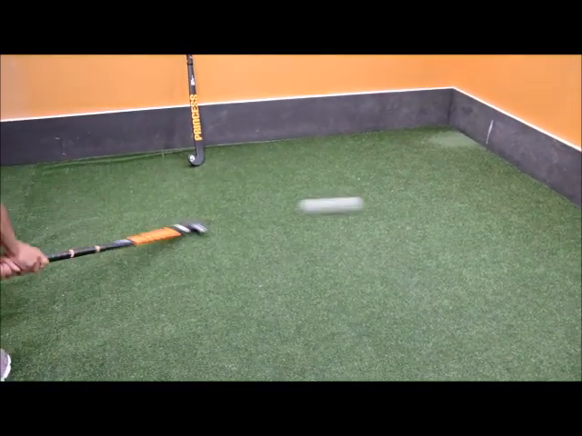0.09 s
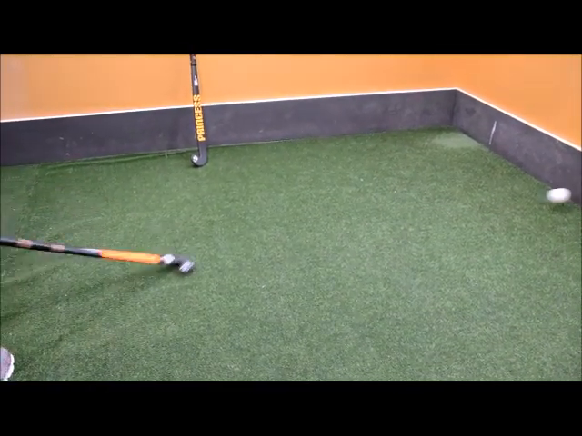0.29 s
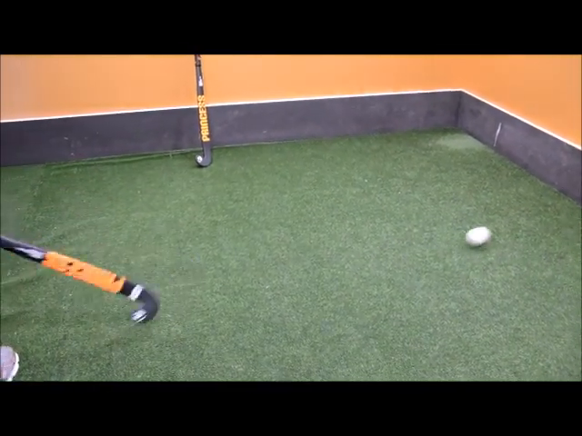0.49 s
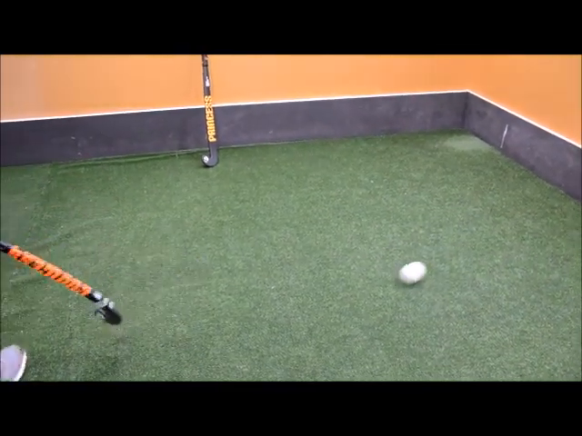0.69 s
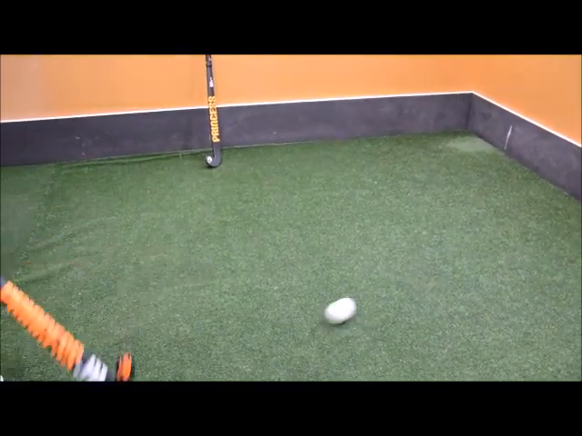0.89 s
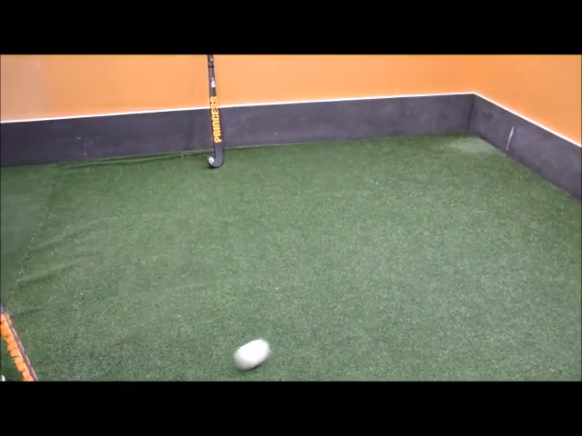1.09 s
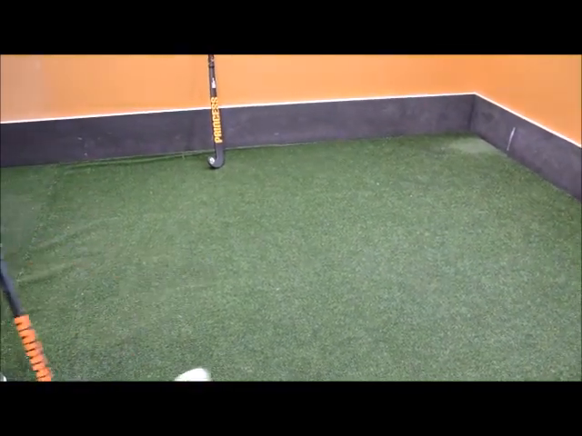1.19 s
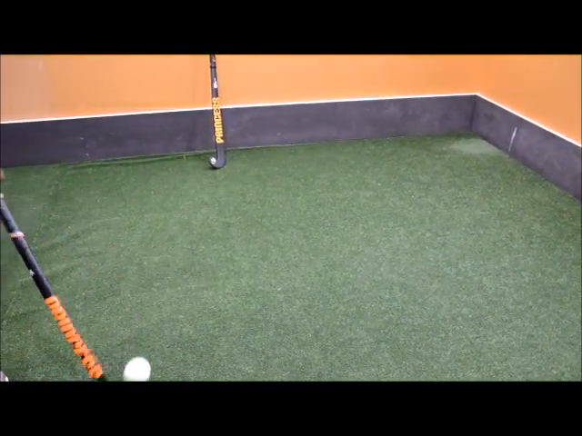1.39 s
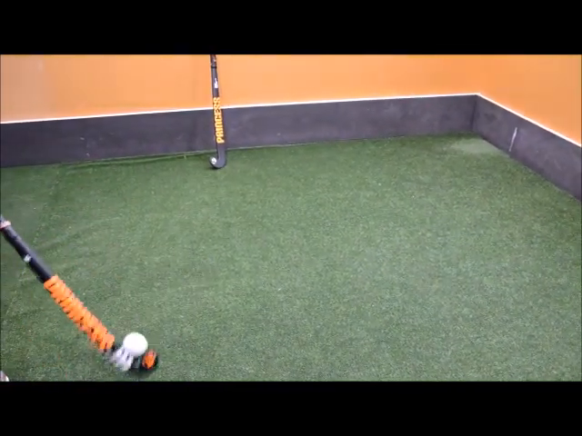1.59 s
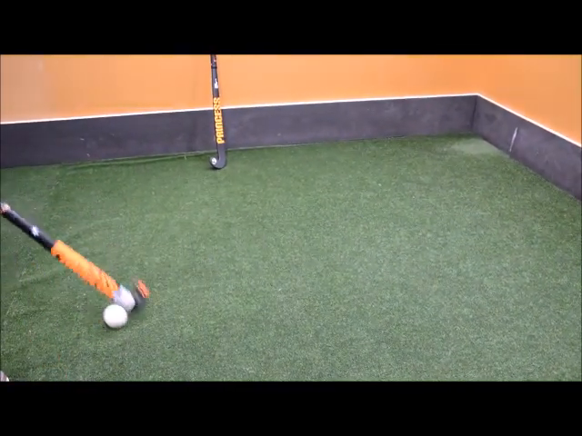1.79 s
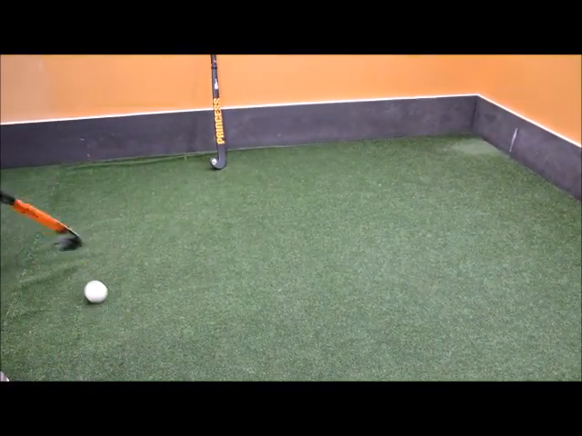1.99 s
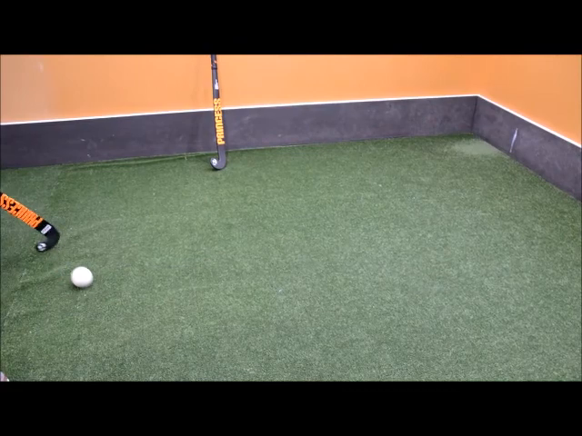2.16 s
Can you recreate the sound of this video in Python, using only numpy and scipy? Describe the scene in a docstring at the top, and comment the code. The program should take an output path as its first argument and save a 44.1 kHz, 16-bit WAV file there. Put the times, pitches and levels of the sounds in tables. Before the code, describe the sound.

Loud ball-on-board bang in a small echoing indoor pitch, followed by a sharp stick knock and light tap

```python
"""A stick shot from just before the start still rings over a quiet ventilation hum, and the turf hisses.
A hard hockey ball slams into the side board of a small echoing indoor pitch and overloads the microphone.
Then the stick stops the ball and taps it. Knocks are sharp cracks plus fading sine waves, with echoes;
shoes and stick scuff the turf as filtered noise with soft thuds, and the hum is shaped noise."""
import sys
import numpy as np
from scipy import signal
from scipy.io import wavfile
from scipy.ndimage import uniform_filter1d

SR = 44100
rng = np.random.default_rng(int(sys.argv[2]) if len(sys.argv) > 2 else 0)


def how_loud(loudness_db):
    """Turn decibels into a plain amplitude multiplier (0 dB gives 1, 20 dB gives 10)."""
    steps = np.asarray(loudness_db, float) / 20
    return 10 ** steps


def master_out(mix):
    """Clip the mix to full scale and print it as 16-bit PCM to the path in sys.argv[1]."""
    frames = np.transpose(np.atleast_2d(mix))
    ceiling = np.clip(frames, -1, 1)
    pcm = np.round(ceiling * 32767).astype(np.int16)
    wavfile.write(sys.argv[1], SR, pcm)


N = 97020  # length in samples
LEAD = SR // 5  # samples made ahead of the start, for the shot that still rings

# Ball on stick. Each row: time in seconds, delay of the first wall echo in seconds.
STICK_TIMES = [(-.07, .0095), (1.2970, .0100), (1.6726, .0089)]
# Strength of those hits. Each row: ring level in dB, crack level in dB, ring tilt in dB per octave,
# crack tilt in dB per octave, level in dB of the ball's thump on the floor.
STICK_HITS = [(-11, 1.5, -6.1, -2, -29), (-9, -5, -1.65, 2, -26), (-22.5, -11, -5.2, -1, -30)]
# Ways the stick vibrates. Each row: frequency in Hz, level in dB before the hit's strength and tilt,
# longest time in seconds to fade by 60 dB.
STICK_MODES = [(520, -17.5, 0.047), (598, -12.5, 0.031), (755, -6, 0.027), (860, -4.5, .02),
               (1120, -2, 0.024), (1295, -1, 0.017), (1684, -6, .055), (2765, -15, 0.0081),
               (3550, -11, 0.024), (4500, -13.5, .005)]
# Tone of the stick's crack before its tilt. Each row: frequency in Hz, gain in dB.
STICK_CRACK = [(200, -21.5), (700, -3.5), (1500, 10), (2300, -4.5), (3500, 2.5), (4500, 1.5), (5700, -0.5),
               (8000, -2.5), (10000, -10.5), (12500, -8), (16500, -15.5)]
# Ways the board vibrates. Each row: frequency in Hz, level in dB before the hit's strength,
# longest time in seconds to fade by 60 dB.
BOARD_MODES = [(101.4, -6.5, 0.075), (131.2, -6.5, 0.11), (176.2, -2, 0.042), (225, -9.5, 0.12),
               (280, -4.5, 0.1), (346, 0, 0.04), (387.6, -3.5, 0.086), (508, -2.5, .04), (691, 1, 0.03),
               (920, -1.5, 0.028), (1052, -9, 0.061), (1380, 11.5, 0.008), (1700, -10.5, 0.006)]
# Tone of the board's crack. Each row: frequency in Hz, gain in dB.
BOARD_CRACK = [(200, -41.5), (700, -33.5), (2000, 13), (2800, 5), (3800, 10.5), (4800, 7), (6200, 10.5),
               (9000, -0.5), (11500, -7.5), (14000, -10.5), (16500, -14)]
# Wall echoes. Each entry: delay, as a multiple of the first echo's delay.
ECHO_DELAYS = [1, 1.5, 1.95, 2.7, 3.65]
# Strength of those echoes. Each entry: level in dB against the direct sound.
ECHO_LEVELS = [-6, -13, -11, -16, -15]
# How fast the hall falls silent. Each row: frequency in Hz, time in seconds to fade by 60 dB.
HALL_T60 = [(60, 0.2), (150, 0.44), (350, 0.56), (700, 0.77), (1500, 0.56), (3000, .5), (6000, 0.5),
            (12000, 0.49)]
# Tone of the hall's tail. Each row: frequency in Hz, relative starting level in dB.
HALL_COLOUR = [(60, -22.5), (300, -1), (1500, -6), (2400, 9), (3600, 4.5), (5000, -2.5), (7000, -8),
               (11000, -3), (14000, -14), (16500, -10.5)]
# Tone of the background. Each row: frequency in Hz, relative level in dB.
AIR_COLOUR = [(15, -79.5), (25, -61), (64, -15.5), (108, 2), (145, -18), (217, -10.5), (300, -13.5),
              (427, -17.5), (800, -18), (1250, -12.5), (1900, -21.5), (2800, -23), (3700, -19.5),
              (5000, -27.5), (8000, -36.5), (12000, -40.5), (16500, -62.5)]
# Small bright ticks on the turf. Each row: time of the peak in seconds, level in dB.
TICKS = [(.112, -56), (.187, -57), (.432, -53), (.555, -60), (.687, -59), (.711, -63), (1.471, -52),
         (1.892, -62)]
# Tone of a tick. Each row: frequency in Hz, relative level in dB.
TICK_COLOUR = [(2000, -48), (5000, 6.5), (9000, -3), (15000, -4), (17000, -37)]
# Scuffs on the turf. Each row: start in seconds, hiss level in dB, rise in seconds,
# time in seconds for the hiss to fade by 60 dB, footfall thud level in dB.
SCUFFS = [(0.131, -36, 0.033, 0.23, -52.5), (0.598, -50, 0.013, 0.82, -53),
          (0.723, -44.5, 0.0076, 0.55, -65), (1.47, -43, 0.0075, 0.13, -40.5),
          (1.58, -48, 0.018, 0.15, -47), (1.802, -45, 0.033, 0.13, -56), (2.098, -77, 0.01, 0.1, -53.5)]
# Tone of the scuffing hiss. Each row: frequency in Hz, relative level in dB.
SCUFF_COLOUR = [(880, -37), (1500, -6), (2040, -6.5), (2880, -4.5), (3550, -6.5), (5020, -13.5),
                (7540, -16), (16000, -51.5)]
# Low wavering tones that swell after the board hit: a hall resonance at 82 Hz, a faint fan hum at 223 Hz.
# Each row: frequency in Hz, level in dB, time in seconds to fade by 60 dB, rise in seconds.
LOW_TONES = [(82, -36, 1.8, .15), (223, -54, 3.5, .2)]

BOARD_S, BOARD_ECHO_S = .2227, .0054  # time of the board hit, delay of its first echo
BOARD_RING_DB, BOARD_CRACK_DB = 0.93, 2.2
BOARD_PUSH_S, STICK_PUSH_S = .0012, .0003  # rise time of the ring
THUMP_HZ, THUMP_T60_S = 324, 0.029  # ball on the floor
MOST_CYCLES, DAMPED_HZ = 80, 2800  # no mode rings longer; high modes far shorter
SCATTER_DB, SCATTER_S = -8, .002  # turf, stick and player scatter the first milliseconds
GROUND_S, GROUND_DB = .0007, -4  # the knock comes back off the ground at once
HALL_DB, HALL_RISE_S = 6.5, .007
AIR_DB = -57.5  # overall loudness of the background
AIR_PATCH_DB, FLICKER_DB, FLICKER_FROM_HZ = .8, 2.5, 4000  # the treble flickers
TICK_S = .003  # time from the start of a tick to its peak
BRISTLE_DB = 0.5  # unevenness of the hiss
THUD_HZ, THUD_T60_S = 109, 0.16  # footfall
WAVER_DB = 4  # unevenness of the low tones
MIC_LOW_HZ = 60  # the knocks and scuffs lose their bass below this
DRIVE_CURVE, CEILING = 3.2, 1.03  # hardness and height of the overload knee


def evened(x):
    """Scales to an average strength (rms) of 1."""
    return x / np.sqrt(np.mean(x ** 2) + 1e-20)


def read(points, hz):
    """Reads a table on a log-frequency axis."""
    f, value = np.transpose(points)
    return np.interp(np.log(hz + 1), np.log(f + 1), value)


def add(mix, s, sound):
    """Mixes a sound in at time s."""
    part = mix[LEAD + round(s * SR):][:len(sound)]
    part += sound[:len(part)]


def coloured(x, points):
    """Filters with the given gain curve, so that nothing sounds before its cause."""
    log_gain = np.log(how_loud(read(points, abs(np.fft.fftfreq(4096, 1 / SR)))))
    response = np.exp(np.conj(signal.hilbert(log_gain)))  # minimum phase
    taps = np.fft.ifft(response).real[:2048]
    return signal.fftconvolve(x, taps)[:len(x)]


def knock(modes, crack, crack_db, push_s, echo_s):
    """A sharp crack and fading vibrations, thrown back by the ground, the walls and the hall."""
    t = np.arange(SR + SR // 2) / SR
    ring = np.zeros(len(t))
    for k, (hz, db, t60) in enumerate(modes):
        longest_s = MOST_CYCLES / hz / (1 + (hz / DAMPED_HZ) ** 4)
        fade = how_loud(db - 60 * t / min(t60, longest_s))
        ring += (-1) ** k * fade * np.sin(2 * np.pi * hz * t)  # neighbours start in opposite directions
    ring *= 1 - np.exp(-(t / push_s) ** 2)
    click = (t == 0).astype(float)
    snap = how_loud(crack_db) * coloured(click, crack)

    early = SR // 10
    walls = rng.standard_normal(early) * np.exp(-t[:early] / SCATTER_S)
    walls = how_loud(SCATTER_DB) * walls / np.linalg.norm(walls)
    walls[0] = 1  # direct sound
    walls[round(GROUND_S * SR)] = how_loud(GROUND_DB)
    for delay, db in zip(ECHO_DELAYS, ECHO_LEVELS):
        walls[round(delay * echo_s * SR)] = how_loud(db)
    near = signal.fftconvolve(ring + snap, walls)[:len(t)]
    return near + hall(ring) + hall(snap)


def hall(x):
    """Many blurred reflections: noise that swells briefly, each band dying at its own speed."""
    hz, t, z = signal.stft(rng.standard_normal(SR), SR, nperseg=256)
    gain_db = read(HALL_COLOUR, hz)[:, None] - 60 * t / read(HALL_T60, hz)[:, None]
    tail = signal.istft(z * how_loud(gain_db), SR, nperseg=256)[1][:SR]
    tail = tail * (1 - np.exp(-(np.arange(SR) / SR / HALL_RISE_S) ** 2))
    tail = tail / np.linalg.norm(tail)
    return how_loud(HALL_DB) * signal.fftconvolve(x, tail)[:len(x)]


def stick_hit(echo_s, ring_db, crack_db, tilt_db, crack_tilt_db, thump_db):
    """Ball on stick: the tilts set how bright the ring and crack are; the ball thumps on the floor."""
    modes = [(THUMP_HZ, thump_db, THUMP_T60_S)]
    for hz, db, t60 in STICK_MODES:
        modes.append((hz, ring_db + db + tilt_db * np.log2(hz / 1000), t60))
    crack = [(hz, db + crack_tilt_db * np.log2(hz / 4000)) for hz, db in STICK_CRACK]
    return knock(modes, crack, crack_db, STICK_PUSH_S, echo_s)


def air():
    """Ventilation and microphone hiss: noise with drifting patches and a flickering treble."""
    hz, t, z = signal.stft(rng.standard_normal(N + 2048), SR, nperseg=1024, noverlap=768)
    patches = uniform_filter1d(rng.standard_normal(z.shape), size=8, axis=0)  # smooth across frequency
    patches = evened(uniform_filter1d(patches, size=12, axis=1))  # and across time
    flicker = evened(uniform_filter1d(rng.standard_normal(len(t)), size=3))
    flicker = flicker * (hz / (hz + FLICKER_FROM_HZ))[:, None]
    z = z * how_loud(read(AIR_COLOUR, hz)[:, None] + AIR_PATCH_DB * patches + FLICKER_DB * flicker)
    noise = signal.istft(z, SR, nperseg=1024, noverlap=768)[1][:N]
    return how_loud(AIR_DB) * evened(noise)


def tick(db):
    """A few stiff bristles snap back: a tiny burst of bright noise."""
    t = np.arange(SR // 20) / SR
    burst = evened(coloured(rng.standard_normal(len(t)), TICK_COLOUR))
    swell = t / TICK_S * np.exp(1 - t / TICK_S)
    return how_loud(db) * burst * swell


def scuff(db, rise_s, t60, thud_db):
    """Bristles of turf hiss unevenly under a sole; the floor gives a soft thud."""
    t = np.arange(SR // 2) / SR
    grit, uneven = rng.standard_normal((len(t), 2)).T
    uneven = evened(uniform_filter1d(uneven, size=150))
    hiss = evened(coloured(grit * how_loud(BRISTLE_DB * uneven), SCUFF_COLOUR))
    thud = np.sin(2 * np.pi * THUD_HZ * t) * how_loud(thud_db - 60 * t / THUD_T60_S)
    rise = 1 - np.exp(-(t / rise_s) ** 2)
    return (hiss * how_loud(db - 60 * t / t60) + thud) * rise


def board_hit():
    """Ball on side board: the panel cracks and its many modes ring."""
    modes = [(hz, BOARD_RING_DB + db, t60) for hz, db, t60 in BOARD_MODES]
    return knock(modes, BOARD_CRACK, BOARD_CRACK_DB, BOARD_PUSH_S, BOARD_ECHO_S)


def low_tone(hz, db, t60, rise_s):
    """A low tone swells, wavers and fades."""
    t = np.arange(SR + SR // 2) / SR
    waver = uniform_filter1d(rng.standard_normal(len(t)), size=2000)
    waver = evened(uniform_filter1d(waver, size=2000))
    level = how_loud(db - 60 * t / t60 + WAVER_DB * waver)
    return level * np.sin(2 * np.pi * hz * t) * (1 - np.exp(-(t / rise_s) ** 2))


def scene():
    """All knocks, scuffs and low tones over the air of the hall."""
    mix = np.zeros(LEAD + N)
    for (s, echo_s), strength in zip(STICK_TIMES, STICK_HITS):
        add(mix, s, stick_hit(echo_s, *strength))
    for s, db in TICKS:
        add(mix, s - TICK_S, tick(db))
    for s, *row in SCUFFS:
        add(mix, s, scuff(*row))
    add(mix, BOARD_S, board_hit())
    for row in LOW_TONES:
        add(mix, BOARD_S, low_tone(*row))
    low_cut = signal.butter(2, MIC_LOW_HZ, "high", fs=SR)
    return signal.lfilter(*low_cut, mix)[None, LEAD:] + air()


def band_limit(x):
    """A steep low-pass at the top of the band."""
    return signal.sosfilt(signal.butter(12, 16760, fs=SR, output="sos"), x)


def record(dry):
    """The microphone input overloads with a rounded knee: loud peaks are squashed below a ceiling."""
    squash = (1 + abs(dry / CEILING) ** DRIVE_CURVE) ** (1 / DRIVE_CURVE)
    mix = dry / squash
    return band_limit(mix)


dry = scene()
out = record(dry)
master_out(out)
```